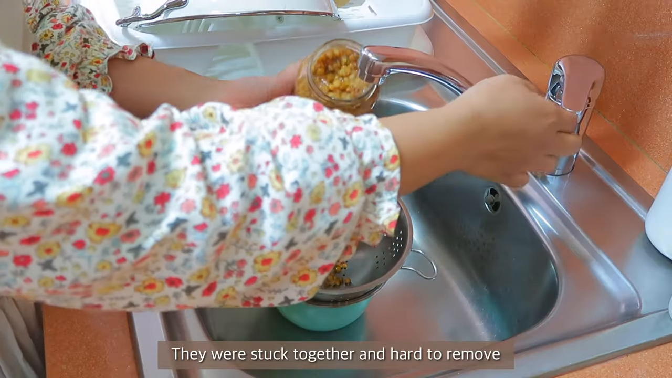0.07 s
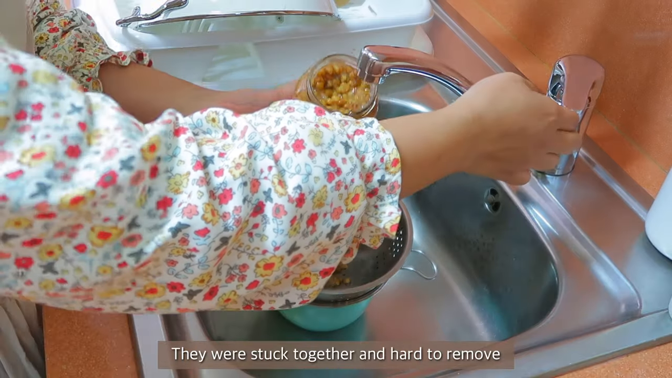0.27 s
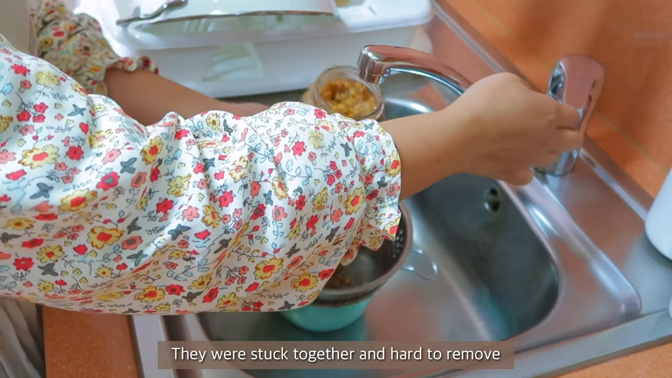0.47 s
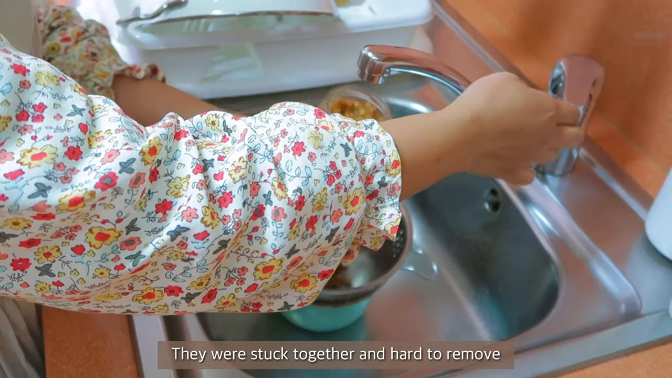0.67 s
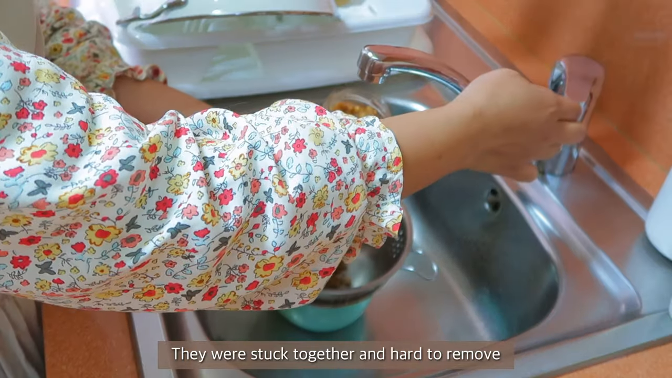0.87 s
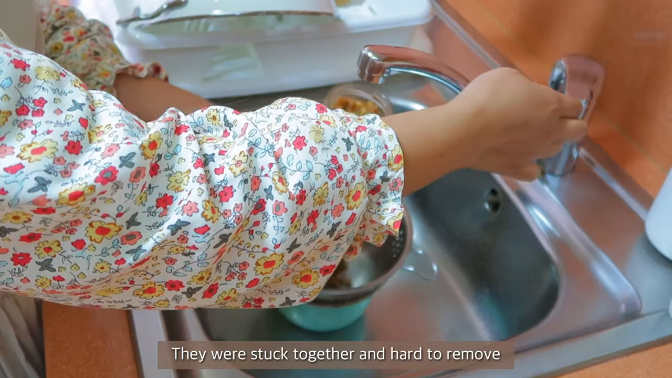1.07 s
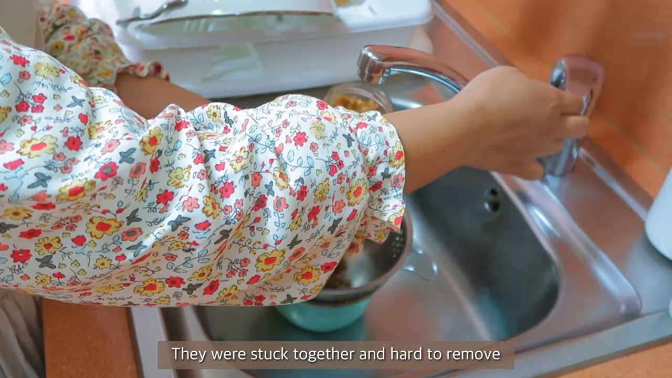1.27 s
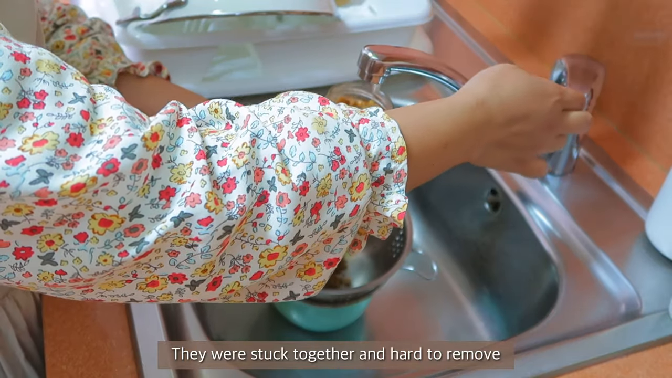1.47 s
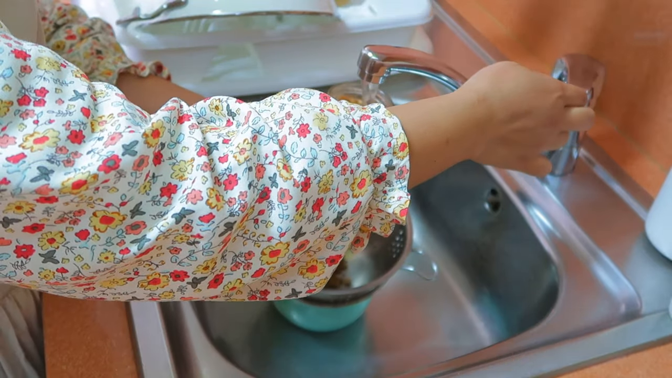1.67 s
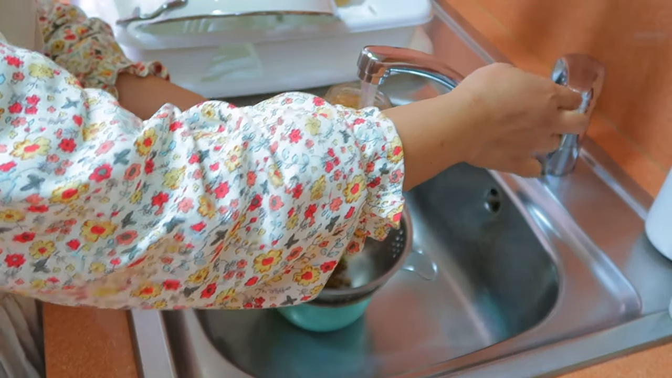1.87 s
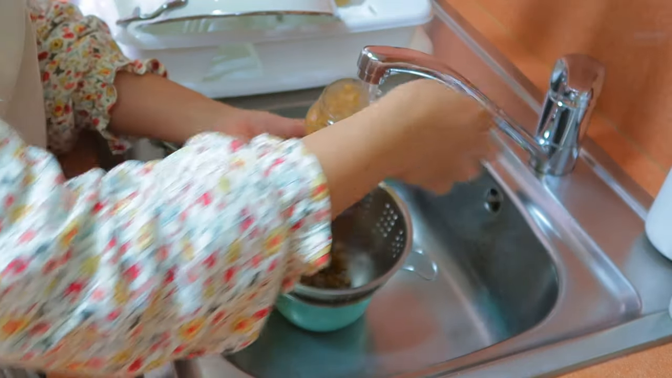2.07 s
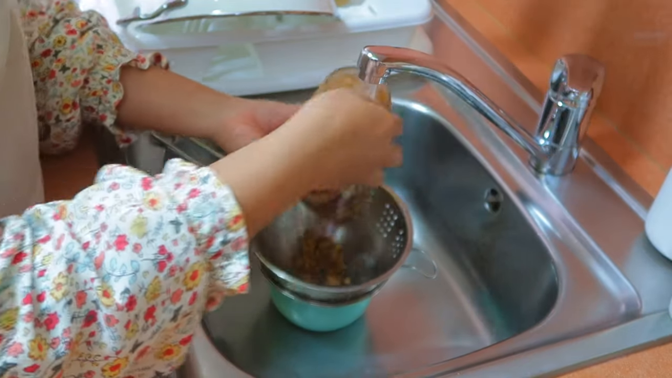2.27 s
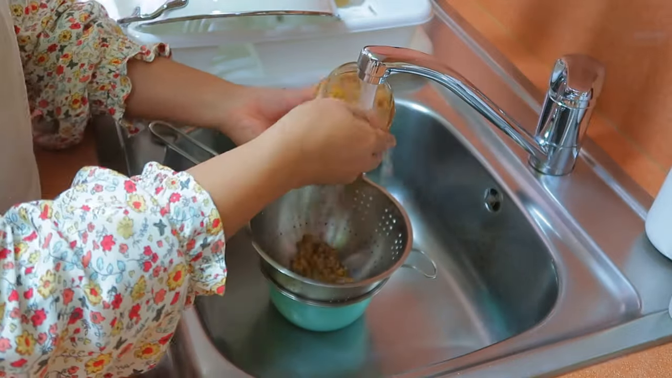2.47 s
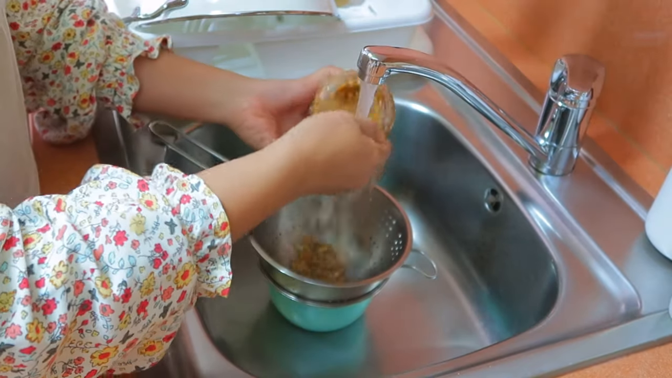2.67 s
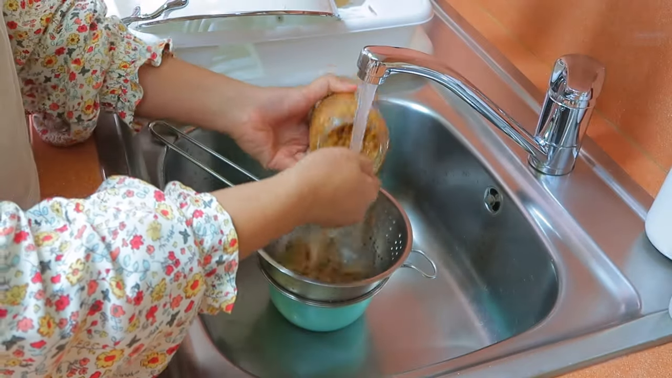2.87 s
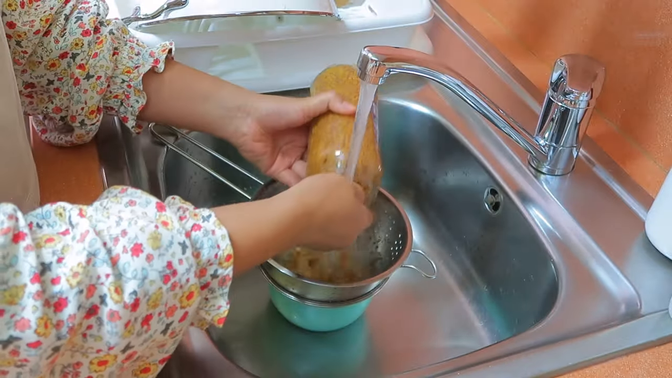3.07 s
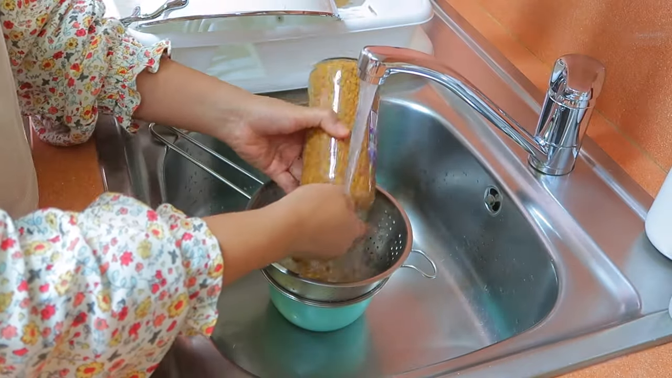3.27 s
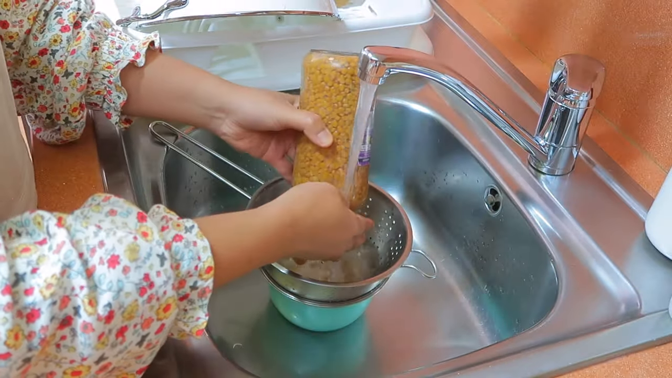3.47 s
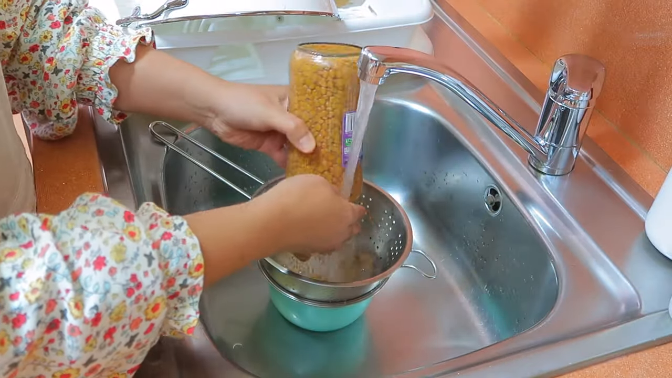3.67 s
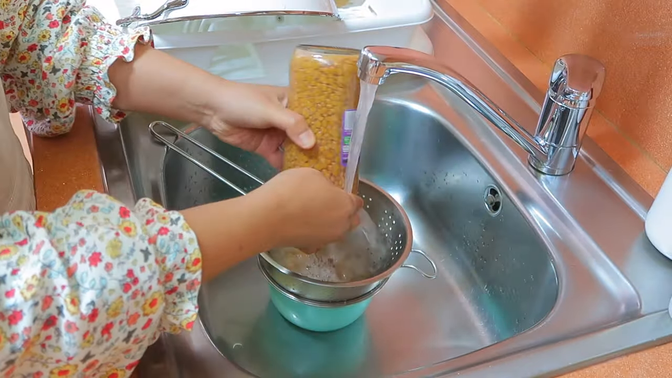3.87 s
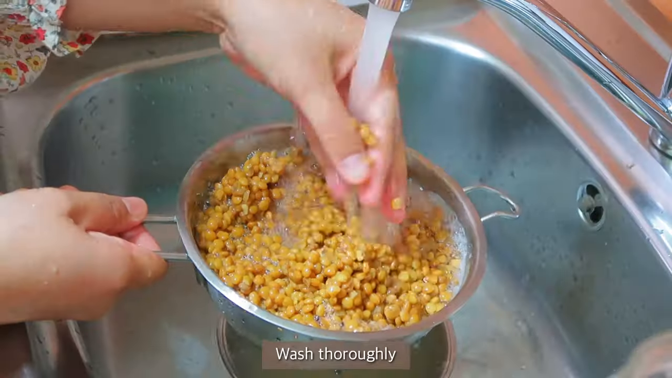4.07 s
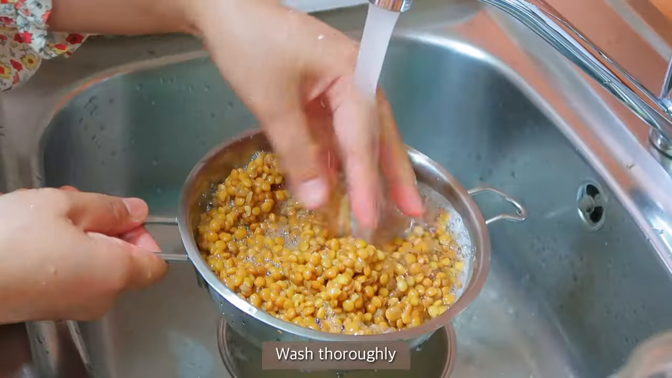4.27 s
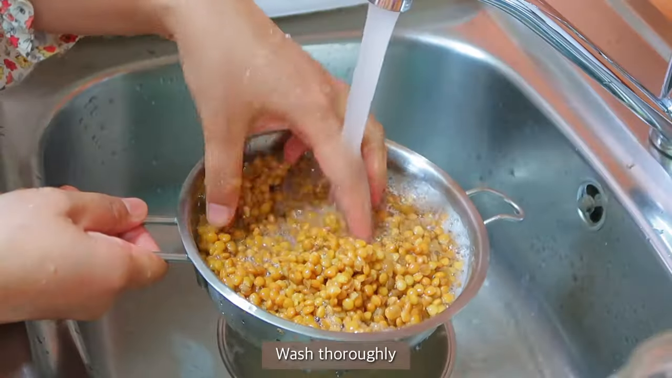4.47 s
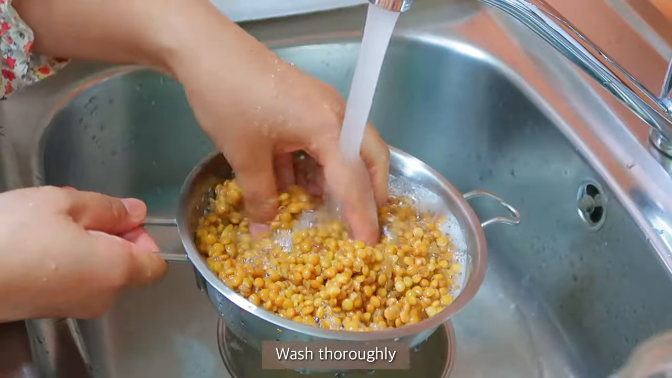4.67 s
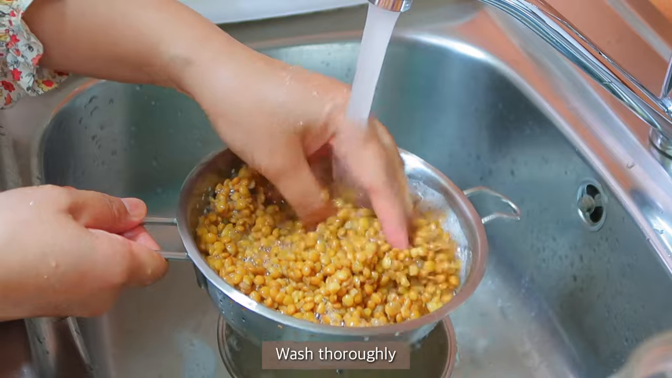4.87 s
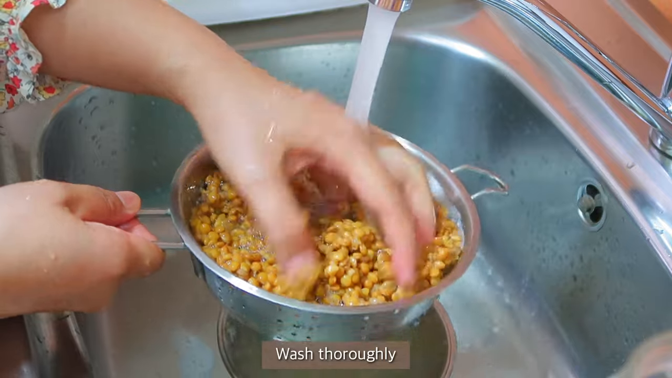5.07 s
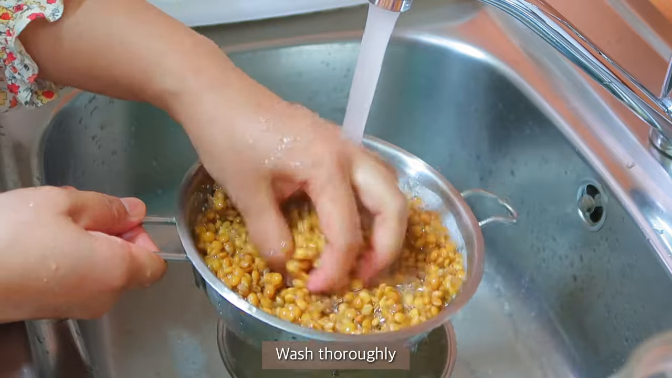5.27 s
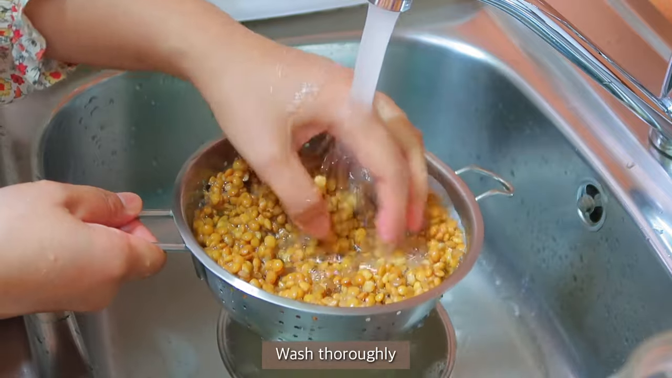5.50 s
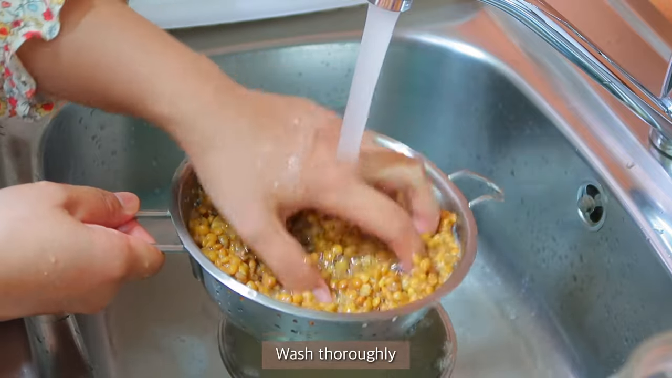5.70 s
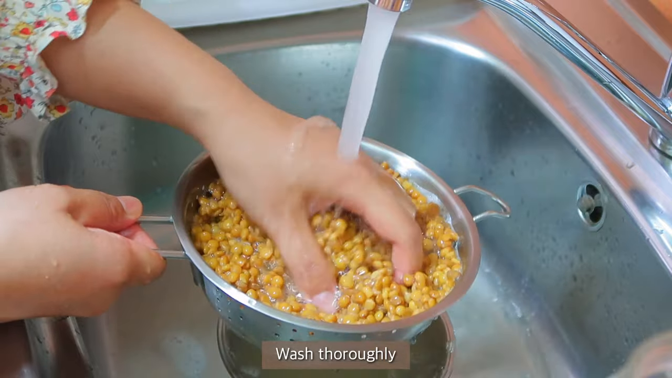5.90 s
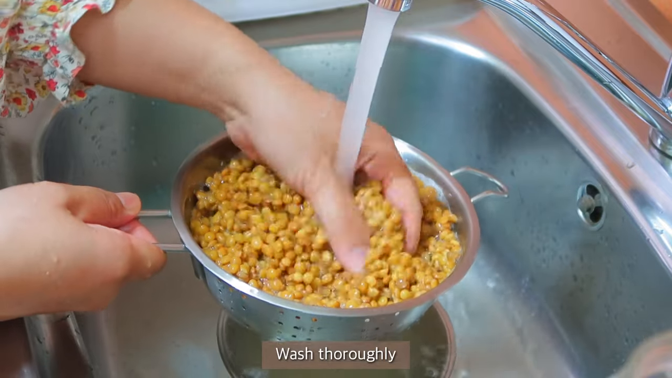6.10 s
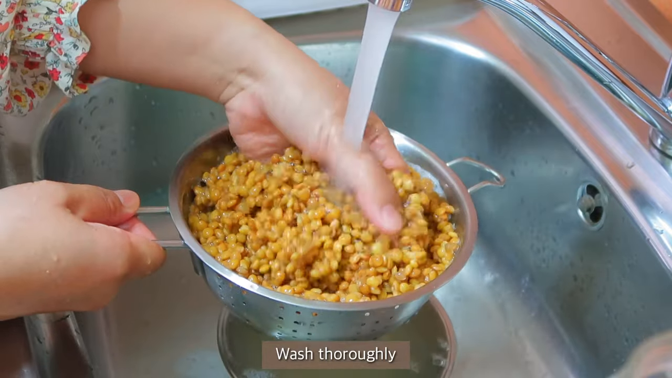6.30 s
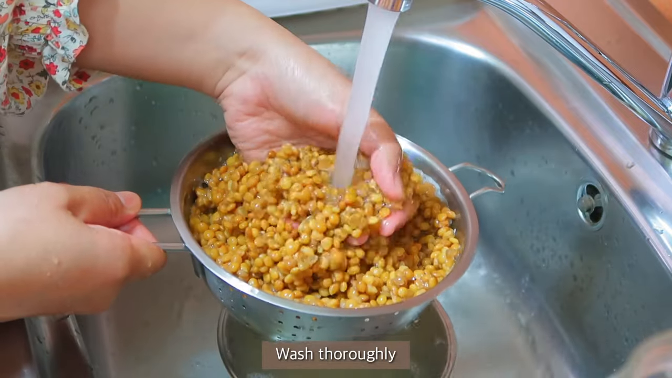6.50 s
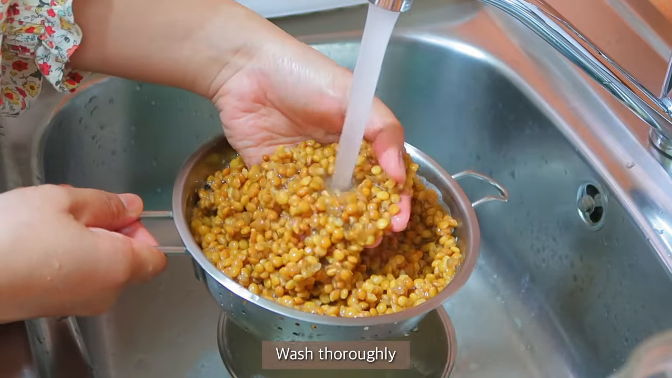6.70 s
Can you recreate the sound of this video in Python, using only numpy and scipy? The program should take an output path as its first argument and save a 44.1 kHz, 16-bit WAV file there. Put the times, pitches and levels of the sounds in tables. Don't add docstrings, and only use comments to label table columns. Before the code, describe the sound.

In a small kitchen, close stereo microphones catch a low fridge hum, then a tap opening softly into a jar of lentils. A sudden gush slaps a metal colander, ringing it, scattering lentils and thumping the steel sink. The jar drains in separate drops and fizzing bubbles. Finally a steady stream rinses the lentils while a hand stirs, with plops, dull sink knocks and one small rising gulp.

```python
import sys
import numpy as np
from scipy import signal
from scipy.fft import rfft, irfft, next_fast_len
from scipy.io import wavfile
from scipy.ndimage import uniform_filter1d

SR = 44100
rng = np.random.default_rng(int(sys.argv[2]) if len(sys.argv) > 2 else 0)


def linear_from_db(decibels):
    return 10 ** (np.asarray(decibels, float) / 20)


def persist_wave(psi):
    counts = np.round(np.clip(psi, -1, 1) * 32767).astype(np.int16)
    wavfile.write(sys.argv[1], SR, np.atleast_2d(counts).T)


N = 297234
HZ = np.fft.rfftfreq(next_fast_len(N + SR), 1 / SR)

# multiple of HUM_HZ, level/dB rms
HUM = [(0.556, -66), (1.001, -50), (2, -48), (2.999, -76), (4, -78), (6, -60)]
HUM_HZ = 49.3
# f/Hz, level/dB per Hz
AIR = [(20, -7), (70, -9), (120, -13), (230, -3.5), (400, -11.5), (650, -19.5), (1200, -22.5),
       (3000, -27.5), (7000, -37.5), (11000, -42.5), (13000, -49)]
AIR_DB = -51
# f/Hz, side minus mid/dB
AIR_SIDE = [(60, -34), (110, -12), (200, -13.5), (380, -4.5), (700, -1), (1290, 0.5), (2380, -0.5),
            (4400, 1.5), (8120, 0), (15000, 6)]
# f/Hz, level/dB rms
WHINE = (13050, -85)
# t/s, splash level/dB
FILL_FLOW = [
    (1.52, -58.5),
    (1.622, -39),
    (1.86, -40),
    (2.09, -37.5),
    (2.17, -37),
    (2.3, -35.5),
]
# t/s, splash level/dB
GUSH_FLOW = [
    (2.325, -13.5),
    (2.339, -18),
    (2.433, -22),
    (2.463, -14.5),
    (2.561, -18.5),
    (2.595, -18),
    (2.659, -34),
    (2.72, -42.5),
]
# t/s, splash level/dB
REFILL_FLOW = [(2.66, -42), (2.738, -38.5), (2.752, -43), (2.765, -37.5), (2.79, -38.5), (2.83, -41),
               (2.908, -36)]
# t/s, splash level/dB
DRAIN_FLOW = [(2.918, -35), (3.04, -34.5), (3.3, -36.5), (3.36, -35.5), (3.486, -34.5), (3.69, -31.5),
              (3.886, -34.5), (4.09, -36)]
# t/s, splash level/dB
RINSE_FLOW = [(4.06, -34.5), (4.48, -34.5), (4.82, -33), (4.9, -34.5), (5.43, -34.5), (5.81, -35),
              (6.22, -34), (6.74, -35)]
# f/Hz, level/dB per Hz
FILL_TONE = [(150, -18), (400, -6), (800, -10), (1700, 2), (2500, -8), (4300, 2.5), (5500, -6), (6300, -8),
             (7500, -14), (9000, -6.5), (10200, -14), (13300, -25), (15000, -21)]
# f/Hz, level/dB per Hz
GUSH_TONE = [(60, -30), (150, 1), (400, 2), (750, -6.5), (1400, -2), (2200, 2.5), (3800, -2.5), (5000, -12),
             (7000, -11.5), (10000, -16), (13000, -23), (15500, -47)]
# f/Hz, level/dB per Hz
DRAIN_TONE = [(60, -23), (150, -4.5), (400, -9), (750, -8.5), (1300, -4), (2200, -3), (3600, 2.5),
              (5000, -4), (7000, -5.5), (10000, -12.5), (13000, -18.5), (15500, -33)]
# f/Hz, level/dB per Hz
RINSE_TONE = [(150, -11), (400, -3), (750, -14), (1100, -16.5), (1700, -2), (3000, 0), (5000, -4.5),
              (7000, -9), (10000, -11.5), (13000, -15.5), (15500, -25)]
# f/Hz, width/Hz, level/dB
TAP_STEEL = [(589, 25, -1), (959, 24, 5), (1350, 17, -6.5), (1740, 45, -4.5), (2080, 38, -5),
             (2790, 62, -3), (2920, 32, -11), (3160, 130, -4), (3450, 14, -6), (3670, 37, -0.5),
             (4250, 56, -8), (4300, 62, -15), (4910, 130, -9), (5680, 21, 0.5), (6060, 33, -12),
             (6460, 380, -2)]
BARE_HZ = [565, 883, 1257, 1338, 1830, 1950, 2272, 2362, 2418, 2796, 3227, 3348, 3644, 3861, 4056, 4334,
           4363, 4570, 4730, 5260, 5685, 6790]
# width/Hz, level/dB
BARE_STEEL = [(30.3, -7.5), (40.3, -0.5), (25, -6), (29.8, 2), (45, -2.5), (30, -7), (25, -18), (20, -5.5),
              (15, -19), (14.9, -3.5), (13, -5.5), (30.2, -2.5), (22, -2.5), (13.9, -0.5), (20, -5),
              (12, 2.5), (16, -3), (30, -4), (60, -11), (36, 0), (30, -8), (90, -4)]
# f/Hz, width/Hz, level/dB
WET_STEEL = [(412.5, 24, 6), (596, 23, 4), (939, 23, 2.5), (1120, 7.2, 5), (1310, 17, -3), (1980, 150, 1.5),
             (2500, 15, -34), (3410, 59, -10), (3700, 180, -24), (4680, 17, 2.5), (4300, 34, -9),
             (7400, 100, -9)]
# f/Hz, width/Hz, level/dB
FULL_STEEL = [(568.3, 22, 4.5), (928, 125, 9.5), (1310, 32, 8.5), (1526, 22, 4.5), (1610, 71, -0.5),
              (5710, 54, 2.5), (2960, 194, -11)]
# t/s, level above the flow/dB, fall time/s
SURGES = [(1.885, 4, 0.023), (2.014, 4, 0.023), (2.15, 1, 0.016), (2.295, 5, 0.03), (3.05, 3, 0.011),
          (3.086, 3.5, .04), (3.185, 6.5, 0.017), (3.326, 6.5, 0.037), (4.32, 3.5, 0.056),
          (4.834, 7, 0.0043), (5.37, 1.5, .04), (5.76, 11, 0.011)]
SURGE_RISE_S, SURGE_ABOVE_HZ = .004, 1000
SPRAY_FOLLOWS = 0.28
# t/s, peak level/dB, centre f/Hz, t60/s
BURSTS = [(1.575, -61, 5160, 0.43), (2.321, -25.5, 9700, 0.048), (2.337, -35, 7000, .1),
          (2.35, -40, 9000, 0.037), (2.459, -31, 9900, 0.087), (2.478, -33, 9500, 0.13),
          (2.495, -33, 9000, .08), (6.085, -19.5, 13700, 0.017), (2.77, -42, 4600, .08),
          (1.63, -49, 5260, .25), (3.53, -44, 9500, 0.4)]
# t/s, peak level/dB, centre f/Hz
SPITS = [(2.803, -41, 10100), (2.858, -38, 8350), (3.048, -34, 7300), (3.1837, -35, 8400),
         (3.3124, -46, 8600), (3.3663, -54, 7800), (3.501, -48, 7050), (3.5545, -35, 7600),
         (3.662, -34, 7400), (3.725, -34, 8180), (3.7744, -43, 10000), (3.936, -34, 8900),
         (3.9927, -36, 7800), (4.465, -38, 8150), (4.5797, -37, 7540), (4.6808, -51, 7390),
         (4.8113, -40, 7830), (5.002, -44, 7350), (5.21, -53, 7720), (5.4077, -45, 7190),
         (5.704, -38.5, 9000), (4.826, -38, 8000), (5.065, -39, 9000)]
SPIT_T60, SPIT_RISE_S = 0.061, .007
# start t/s, level/dB, length/s
PUSHES = [(1.588, -55, .02), (1.657, -45, 0.041), (1.75, -47, 0.47), (1.93, -49, 0.14),
          (2.316, -19.5, 0.0063), (2.333, -23, 0.045), (2.38, -28.5, 0.15), (2.48, -25, .11),
          (2.693, -39, 0.031), (2.775, -40.5, 0.2), (3.017, -44.5, 0.22), (3.24, -49.5, 0.25),
          (3.568, -40, 0.043), (3.672, -44.5, 0.6), (4.248, -35, 0.038), (4.35, -34.5, 0.06),
          (4.566, -42, 0.027), (4.71, -45, 0.15), (4.907, -39.5, 0.024), (5.056, -30, 0.065),
          (5.138, -38.5, 0.42), (5.68, -37, 0.067), (5.76, -42, 0.25), (5.995, -40.5, 0.15),
          (6.197, -29.5, 0.027), (6.292, -31, 0.013), (6.433, -39.5, 0.17), (6.53, -43, 0.24)]
PUSH_RISE_S, PUSH_FALL_DB_PER_S = 0.033, 381
# f/Hz, width/Hz, level/dB
SINK_MODES = [(84.2, 10.2, 4), (105.9, 17.6, -1), (123.3, 37.5, -4.5), (142.2, 34, -8.5)]
# t/s, peak level/dB, f/Hz, t60/s
DRIPS = [(1.6193, -37.0, 4340, 0.052), (1.6378, -37, 4130, 0.009), (1.6393, -38, 1810, 0.036),
         (1.6458, -35.0, 5080, 0.007), (1.6592, -36.0, 5230, 0.066), (1.6702, -38.0, 4910, 0.012),
         (1.6932, -28, 5680, 0.0087), (1.8737, -37.0, 4910, 0.011), (2.0133, -26, 2200, 0.0083),
         (2.0269, -37, 1980, 0.012), (2.1037, -31, 4310, 0.021), (2.1501, -30, 2960, 0.011),
         (2.1531, -36.0, 5000, 0.011), (2.1527, -25, 1730, 0.017)]
# t/s, peak level/dB, f/Hz, t60/s
THROWN = [(2.332, -16, 1730, 0.0062), (2.3332, -10, 3450, 0.0062), (2.3477, -15, 4330, 0.005),
          (2.3537, -14, 2000, 0.018), (2.406, -14, 1670, 0.0083), (2.4385, -13, 2290, 0.016),
          (2.4589, -12, 2350, 0.0054), (2.4624, -8, 3260, 0.01), (2.4664, -10, 2060, 0.024),
          (2.4724, -20, 3240, 0.007), (2.4727, -10, 1344, 0.033), (2.4809, -6.5, 3270, 0.007),
          (2.4923, -16, 2200, 0.0076), (2.4935, -13, 3360, 0.0046), (2.5133, -21, 2230, 0.03),
          (2.5158, -16, 3880, 0.011), (2.5173, -30, 1310, 0.017), (2.5273, -20, 3270, 0.0074),
          (2.5673, -13, 4200, 0.018), (2.5926, -14, 1900, 0.0071)]
# t/s, peak level/dB, f/Hz, t60/s
GLASS_TAP = (2.5, -28.5, 4596, 0.4)
# t/s, peak level/dB, f/Hz, t60/s
DROPS = [(2.7604, -30, 3450, 0.018), (2.8315, -25, 2920, 0.015), (2.9139, -26, 1280, 0.0063),
         (2.9338, -18, 3080, 0.0099), (2.9393, -28, 3100, 0.015), (2.978, -27, 1680, 0.015),
         (3.004, -24, 3700, 0.011), (3.046, -23, 3840, 0.022), (3.0466, -15.5, 4560, 0.01),
         (3.047, -27, 6030, 0.011), (3.0825, -18.5, 3250, 0.0062), (3.0865, -22, 3200, 0.016),
         (3.089, -29, 4220, 0.005), (3.1044, -20, 2000, 0.011), (3.1054, -23.5, 1175, 0.024),
         (3.1064, -22, 3450, 0.011), (3.1419, -24, 2500, 0.011), (3.1838, -21.5, 1995, 0.015),
         (3.315, -18, 2280, 0.02), (3.3264, -24, 2130, 0.034), (3.3384, -17, 2500, 0.014),
         (3.3913, -26, 1810, 0.008), (3.4088, -18, 3700, 0.012), (3.4147, -24.0, 3100, 0.0072),
         (3.4237, -26, 3300, 0.014), (3.4586, -26, 1120, 0.015), (3.5529, -25, 4390, 0.018),
         (3.5923, -29.0, 2500, 0.031), (3.5943, -27, 1450, 0.019), (3.5968, -21.5, 1640, 0.021),
         (3.6008, -21, 2960, 0.009), (3.6058, -27, 4000, 0.018), (3.6332, -30, 3530, 0.01),
         (3.6412, -22, 3400, 0.013), (3.6527, -23, 2030, 0.019), (3.6766, -23, 1940, 0.028),
         (3.6986, -21, 4400, 0.0071), (3.7021, -25.5, 1120, 0.022), (3.7021, -30, 2250, 0.027),
         (3.7051, -23, 3400, 0.017), (3.7076, -36, 1140, 0.0064), (3.7505, -23, 4400, 0.01),
         (3.777, -26, 4300, 0.012), (3.7804, -20.5, 3450, 0.018), (3.8183, -24, 2500, 0.013),
         (3.8398, -29.5, 2160, 0.027), (3.8453, -26, 1900, 0.01), (3.9341, -22.5, 3270, 0.014),
         (3.9585, -19, 2500, 0.0076), (4.0423, -23.5, 1430, 0.0053)]
# t/s, peak level/dB, f/Hz, t60/s
PLOPS = [(4.0802, -26.5, 1000, 0.011), (4.1338, -26, 1660, 0.0093), (4.1518, -24, 3960, 0.011),
         (4.3546, -29, 2850, 0.011), (4.3601, -33, 2800, 0.021), (4.391, -28, 1980, 0.026),
         (4.423, -24.5, 1980, 0.018), (4.445, -25, 3190, 0.012), (4.4504, -31, 3560, 0.009),
         (4.5116, -21.5, 1680, 0.017), (4.6155, -27.5, 2010, 0.056), (4.7023, -20, 3450, 0.0071),
         (4.7722, -25, 3010, 0.014), (4.8046, -29, 2840, 0.009), (4.826, -27, 4850, 0.011),
         (4.825, -24.5, 2814, 0.047), (4.8265, -32, 6140, 0.033), (4.8325, -21, 2930, 0.011),
         (4.833, -34, 1620, 0.011), (4.919, -28, 2580, 0.008), (4.9273, -25, 2780, 0.01),
         (5.0047, -23, 3800, 0.014), (5.006, -28, 1310, 0.02), (5.018, -31, 2320, 0.036),
         (5.1114, -22, 2290, 0.023), (5.12, -21, 2390, 0.018), (5.194, -30, 1277, 0.063),
         (5.3296, -24, 2840, 0.01), (5.3608, -25, 5000, 0.015), (5.3633, -30, 3200, 0.022),
         (5.3703, -24, 3640, 0.005), (5.374, -21, 1750, 0.018), (5.3942, -22.5, 2110, 0.021),
         (5.521, -26, 3040, 0.021), (5.5942, -24, 1540, 0.012), (5.6544, -23.5, 2850, 0.02),
         (5.717, -24, 3140, 0.008), (5.759, -28, 3170, 0.021), (5.7689, -26, 3030, 0.0087),
         (5.885, -23.5, 1960, 0.02), (6.0552, -22.5, 2920, 0.012), (6.142, -21.5, 3250, 0.0087),
         (6.167, -37, 1670, 0.043), (6.209, -28, 2220, 0.014), (6.2593, -27, 4100, 0.011),
         (6.356, -31, 1550, 0.011), (6.391, -22, 3080, 0.011), (6.44, -22, 2280, 0.017),
         (6.558, -24, 1970, 0.013), (6.718, -24, 2250, 0.014)]
RIM_HZ = 3700
TICK_T60, TICK_SHARE = 0.024, 0.36
GLIDE_T60 = .03
RING_ADD_S = .008
# t/s, peak level/dB, t60/s
SLAP = (2.3166, -1.5, .07)
# f/Hz, width/Hz, level/dB
SLAP_STEEL = [(250, 46, -14), (626, 46, 4), (1130, 110, 1), (2000, 95, 3), (2600, 160, 3.5),
              (3560, 260, 6.5), (4850, 79, 4.5)]
# t/s, peak level/dB, f/Hz, rise/s, t60/s
THUMP = (2.317, -10.5, 142, .01, .09)
# t/s, peak level/dB, start f/Hz, rise/Hz per s, hold/s, t60/s
GULP = (5.758, -28.5, 835, 1900, .03, .16)
# f/Hz, side minus mid/dB
PORT_SIDE = [(100, -60), (240, -46), (380, -27), (900, -21), (1500, -19), (2400, -18), (3800, -7.5),
             (6000, -1.5), (8300, 8), (10000, 5.5), (11300, 16.5), (12600, 10.5), (13800, 2.5), (15500, -3)]
# f/Hz, share 0-1
SCATTER = [(300, 0.34), (1500, 0.3), (3000, 0.78), (6000, 0.9), (12000, 1)]
KNEE = 1.6
EDGE_HZ = 15600


def evened(x):
    return x / np.sqrt(np.mean(x ** 2) + 1e-20)


def read(points, hz):
    f, value = np.transpose(points)
    return np.interp(np.log(hz + 1), np.log(f + 1), value)


def shape(x, response):
    size = next_fast_len(N + SR)
    return irfft(rfft(x, size) * response, size)[..., :N]


def ringing(modes):
    return sum((-1) ** k * linear_from_db(db) / (1 + 2j * (HZ - hz) / width)
               for k, (hz, width, db) in enumerate(modes))


def fade(u, t60):
    return linear_from_db(-60 * u / max(t60, .005)) * np.clip(u / .0005, 0, 1)


def add(mix, s, sound):
    part = mix[round(s * SR):][:len(sound)]
    part += sound[:len(part)]


def band(noise, low_hz, high_hz):
    b, a = signal.butter(2, [low_hz, min(high_hz, SR / 2.2)], "band", fs=SR)
    return evened(signal.lfilter(b, a, noise))


def fridge():
    t = np.arange(N) / SR
    waver = 1 + 0.016 * evened(shape(rng.standard_normal((len(HUM), N)), HZ < 2.5))
    return sum(np.sqrt(2) * linear_from_db(db) * w * np.sin(2 * np.pi * (k * HUM_HZ * t + rng.random()))
               for (k, db), w in zip(HUM, waver))


def air():
    mid, side = shape(rng.standard_normal((2, N)), linear_from_db(read(AIR, HZ)))
    side = shape(side, linear_from_db(read(AIR_SIDE, HZ)))
    return linear_from_db(AIR_DB) / np.std(shape(mid, HZ > 160)) * np.array([mid, side])


def whine():
    hz, db = WHINE
    return linear_from_db(db + 6) * np.sin(2 * np.pi * hz * np.arange(N) / SR)


def level(rows):
    (s, db), t = np.transpose(rows), np.arange(N) / SR
    gate = np.clip((t - s[0]) / .004, 0, 1) * np.clip((s[-1] - t) / .02 + 1, 0, 1)
    return gate * linear_from_db(np.interp(t, s, db))


def droplets(per_s, spread_db):
    when, size, sign = rng.random((N, 3)).T
    height = linear_from_db(-spread_db * np.log(size + 0.00054))
    return evened((when < per_s / SR) * height * np.sign(sign - .5))


def patchy(x, patch_db, flicker_db):
    hz, t, z = signal.stft(x, nperseg=256, noverlap=192)
    chance = rng.standard_normal((len(t), len(hz) + 1)).T
    over_pitch = uniform_filter1d(chance[1:], size=4, axis=0)
    patches = evened(uniform_filter1d(over_pitch, size=14, axis=1))
    flicker = evened(uniform_filter1d(chance[0], size=10))
    z = z * linear_from_db(patch_db * patches + flicker_db * flicker)
    return evened(signal.istft(z, nperseg=256, noverlap=192)[1][:N])


def surges_db():
    t = np.arange(N) / SR
    return sum(db * np.clip((t - s) / SURGE_RISE_S + 1, 0, 1) * np.exp(-np.clip(t - s, 0, 1) / fall)
               for s, db, fall in SURGES)


def water(rows, surge_db, tone, steel, ring_db, per_s, spread_db, patch_db, flicker_db, spray_db=(0, 0)):
    drive = patchy(droplets(per_s, spread_db), patch_db, flicker_db)
    response = linear_from_db(read(tone, HZ)) * (1 + linear_from_db(ring_db) * ringing(steel))
    scale = np.std(shape(drive, response * (HZ > 500) * (HZ < 6000)))
    flow = drive * level(rows)
    drift_db = np.interp(np.arange(N) / SR, [rows[0][0], rows[-1][0]], spray_db)
    spray = flow * linear_from_db(drift_db + SPRAY_FOLLOWS * surge_db)
    fine = 1 / (1 + (6500 / (HZ + 1)) ** 6)
    slow = 1 / (1 + (HZ / SURGE_ABOVE_HZ) ** 4)
    splash = shape(flow * linear_from_db(surge_db), response * (1 - fine - slow))
    return (splash + shape(spray, response * (fine + slow))) / scale


def spray_puffs():
    out, u = np.zeros(N), np.arange(6000) / SR
    for s, db, hz, t60 in [*[(*row, SPIT_T60) for row in SPITS], *BURSTS]:
        puff = band(rng.standard_normal(len(u)), hz * 0.8, hz * 1.22) * fade(u, t60)
        ends = np.clip(u / SPIT_RISE_S, 0, 1) * np.clip((u[-1] - u) / 0.044, 0, 1)
        add(out, s, linear_from_db(db + 5.5) * puff * ends)
    return out


def pushes():
    out, u = np.zeros(N), np.arange(SR) / SR
    for s, db, length in PUSHES:
        part = out[round(s * SR):][:SR]
        let_go = linear_from_db(db - PUSH_FALL_DB_PER_S * np.clip(u - length, 0, 1))
        push = np.clip(u / min(PUSH_RISE_S, length), 0, 1) * let_go
        part[:] = np.maximum(part, push[:len(part)])
    return out


def sink_floor():
    basin = ringing(SINK_MODES) * (1j * HZ / (70 + 1j * HZ)) ** 4 / (1 + 1j * HZ / 300)
    rumble = shape(droplets(1500, 3.75), basin)
    power = uniform_filter1d(uniform_filter1d(rumble ** 2, size=1500), size=1500)
    steady = rumble / np.sqrt(power + 1e-9)
    return shape(steady * pushes(), 1 / (1 + (HZ / 260) ** 4) / (1 + (68 / (HZ + 1)) ** 12))


def bounced(sound):
    wait, size = rng.random((2, 2))
    taps = np.zeros(round(.016 * SR) + 1)
    taps[0] = 1
    landings = np.round(np.cumsum(.003 + .004 * wait) * SR).astype(int)
    taps[landings.clip(1, len(taps) - 1)] = 0.34 * size
    return signal.oaconvolve(sound, taps)


def drops_and_lentils():
    out, u = np.zeros(N), np.arange(6000) / SR
    for s, db, hz, t60 in [*DROPS, *PLOPS, *DRIPS, *THROWN, GLASS_TAP]:
        rim_hz = RIM_HZ * rng.uniform(0.72, 1.8)
        glide = 0.63 * u * min(1, GLIDE_T60 / t60) ** 2
        ring = np.sin(2 * np.pi * hz * u * (1 + glide)) + 0.12 * np.sin(2 * np.pi * rim_hz * u)
        ring *= fade(u, RING_ADD_S + 1.16 * t60) * np.clip(u / (.0007 + 0.065 * t60), 0, 1)
        tick = np.clip(TICK_SHARE * .012 / t60, 0, .55)
        crack = 0.68 * band(rng.standard_normal(len(u)), 0.81 * hz, 1.19 * hz) * fade(u, TICK_T60)
        add(out, s, linear_from_db(db + 3.0) * bounced((1 - tick) * ring + tick * crack))
    return out


def slap():
    s, db, t60 = SLAP
    burst, u = np.zeros(N), np.arange(6000) / SR
    add(burst, s, rng.standard_normal(len(u)) * fade(u, t60))
    rung = shape(burst, (linear_from_db(-12.0) + ringing(SLAP_STEEL)) / (1 + 1j * HZ / 7000) ** 3)
    out = linear_from_db(db) * rung / abs(rung).max()
    s, db, hz, rise, t60 = THUMP
    add(out, s, linear_from_db(db) * np.sin(2 * np.pi * hz * u) * fade(u, t60) * np.clip(u / rise, 0, 1))
    return out


def bubbles(flow, db, per_s, low_hz, high_hz, cycles):
    out, u = np.zeros(N), np.arange(1200) / SR
    births, sizes = droplets(per_s, 1.8), rng.integers(0, 24, size=N)
    for k, hz in enumerate(np.geomspace(low_hz, high_hz, num=24)):
        chirp = np.sin(2 * np.pi * hz * u * (1 + 0.145 * hz * u / cycles))
        chirp *= np.exp(-hz * u / cycles * 3) * np.clip(hz * u, 0, 1)
        out += signal.oaconvolve(births * (sizes == k), chirp / np.linalg.norm(chirp))[:N]
    return linear_from_db(db) * evened(out) * flow


def gulp():
    out, u = np.zeros(N), np.arange(6000) / SR
    s, db, hz, rise, hold, t60 = GULP
    tone = np.sin(2 * np.pi * np.cumsum(hz + rise * u) / SR)
    add(out, s, linear_from_db(db - 60 * np.clip(u - hold, 0, 1) / t60) * tone * np.clip(u / 0.002, 0, 1))
    return out


def kitchen(x, t60):
    u = np.arange(SR // 2) / SR
    signs = np.sign(rng.standard_normal((2, len(u))))
    taps = signs * (rng.random((2, len(u))) < 2500 / SR) * linear_from_db(-60 * u / t60) * (u > .002)
    taps = taps / np.linalg.norm(taps, axis=1, keepdims=True)
    return signal.fftconvolve(x[None], taps, axes=1)[:, :N]


def ports(x, wet_db, lean):
    angle = np.arctan(linear_from_db(read(PORT_SIDE, HZ)))
    unlike = np.clip(read(SCATTER, HZ), 0, 1)
    tail, other = kitchen(x, t60=0.19)[0], kitchen(x, t60=0.13)[1]
    heard = x + linear_from_db(wet_db) * tail
    alike = np.sqrt(1 - unlike ** 2) * np.exp(-1j * (np.pi / 2 + lean))
    side = shape(heard, np.sin(angle) * alike) + shape(other, np.sin(angle) * unlike)
    return np.array([shape(heard, np.cos(angle)), side])


def scene():
    bare = [(hz, *size) for hz, size in zip(BARE_HZ, BARE_STEEL)]
    surge = surges_db()
    wet = water(FILL_FLOW, surge, FILL_TONE, TAP_STEEL, ring_db=13.0, per_s=20000, spread_db=3.0,
                patch_db=0.3, flicker_db=0.1, spray_db=(3, -2.5))
    wet += water(GUSH_FLOW, surge, GUSH_TONE, bare, ring_db=16.0, per_s=7300, spread_db=2.5,
                 patch_db=1.5, flicker_db=0.3, spray_db=(-3, -3))
    wet += water(REFILL_FLOW, surge, FILL_TONE, TAP_STEEL, ring_db=11.5, per_s=29000, spread_db=3.5,
                 patch_db=0.0, flicker_db=-0.7)
    wet += linear_from_db(-1.0) * water(DRAIN_FLOW, surge, DRAIN_TONE, WET_STEEL, ring_db=8.5, per_s=20000,
                             spread_db=2.5, patch_db=2.5, flicker_db=0.8)
    wet += linear_from_db(-1.48) * water(RINSE_FLOW, surge, RINSE_TONE, FULL_STEEL, ring_db=8.0, per_s=26000,
                              spread_db=1.5, patch_db=1.5, flicker_db=0.72)
    wet += bubbles(level(DRAIN_FLOW) * linear_from_db(surge), db=-5.5, per_s=930, low_hz=1310, high_hz=4560, cycles=12.7)
    wet += bubbles(level(RINSE_FLOW) * linear_from_db(surge), db=-7.0, per_s=700, low_hz=1292, high_hz=4400, cycles=17.5)
    close = wet + spray_puffs() + drops_and_lentils() + slap() + gulp()
    mid, side = ports(close, wet_db=-10.5, lean=0.33) + air()
    mid = mid + sink_floor() + fridge()
    side = side + whine()
    return np.array([mid + side, mid - side])


def top_cut(x):
    return signal.sosfilt(signal.butter(12, 15710, fs=SR, output="sos"), x)


def record(dry):
    rounded = np.tanh(dry / KNEE) * KNEE
    mix = shape(rounded, HZ < EDGE_HZ)
    return top_cut(mix)


dry = scene()
out = record(dry)
persist_wave(out)
```